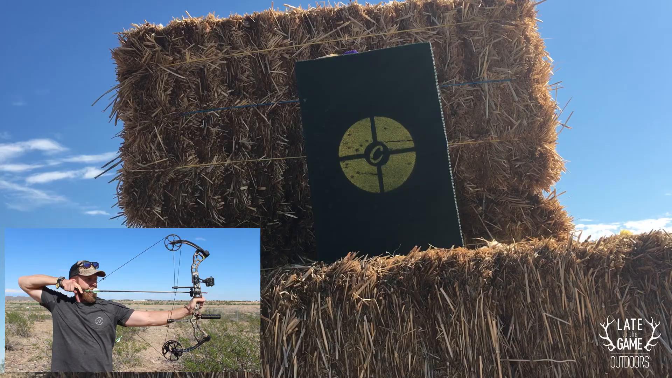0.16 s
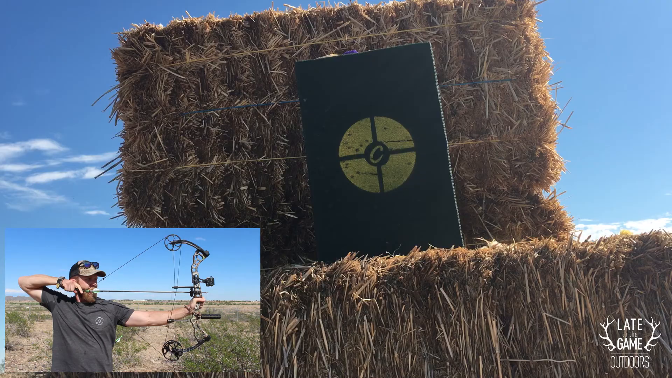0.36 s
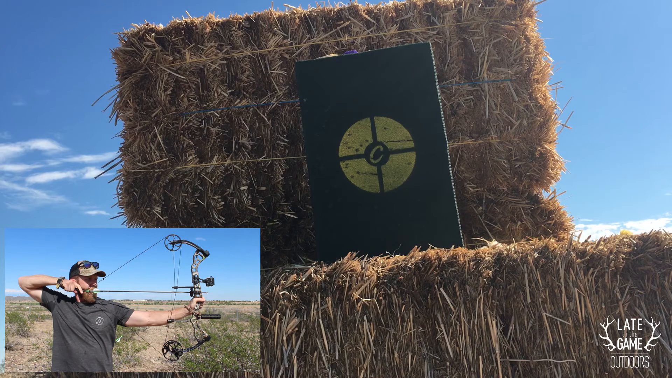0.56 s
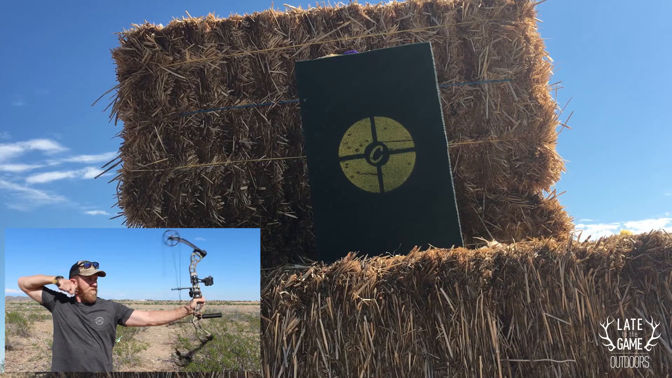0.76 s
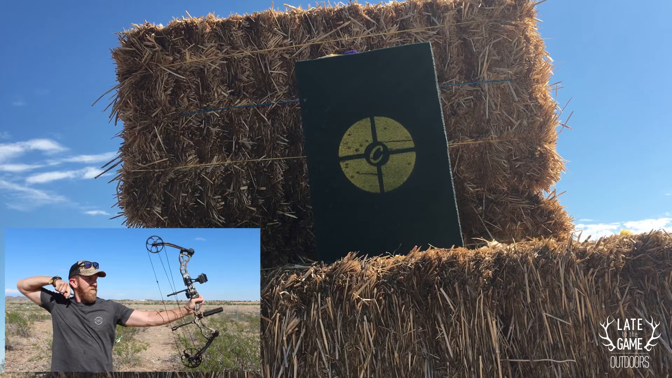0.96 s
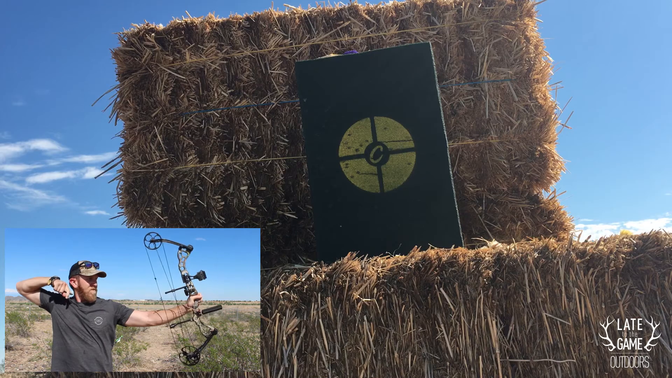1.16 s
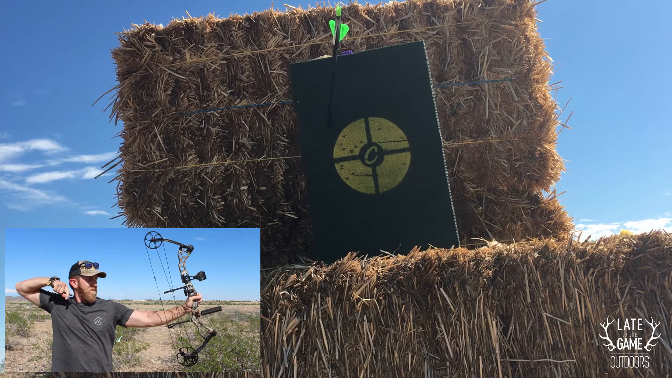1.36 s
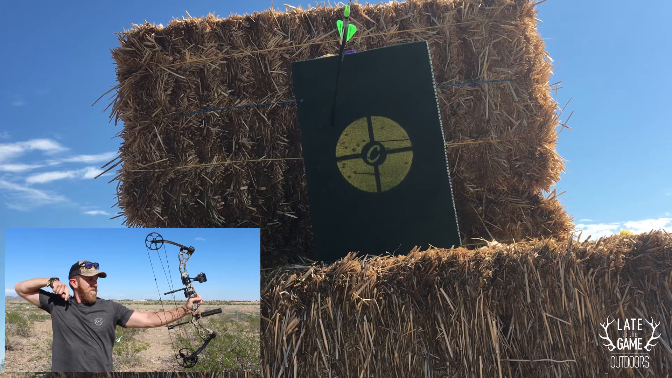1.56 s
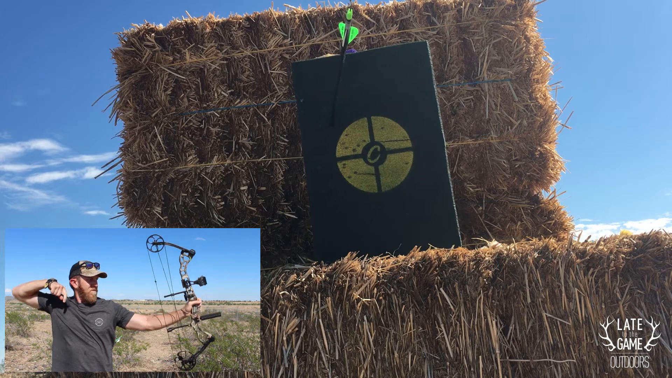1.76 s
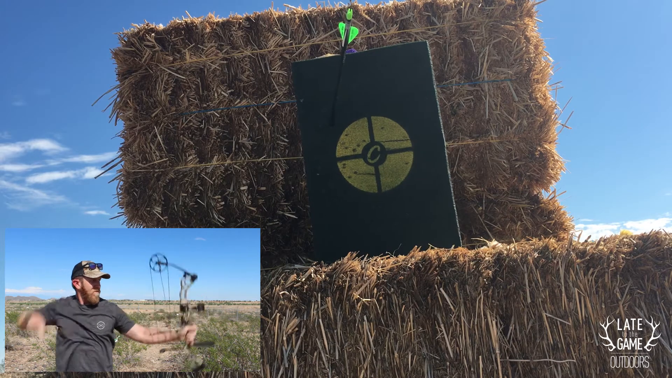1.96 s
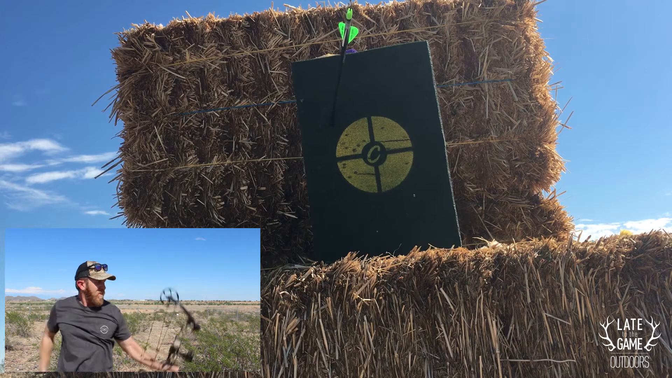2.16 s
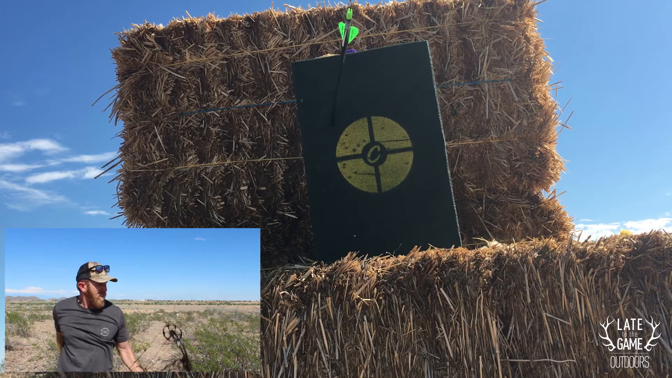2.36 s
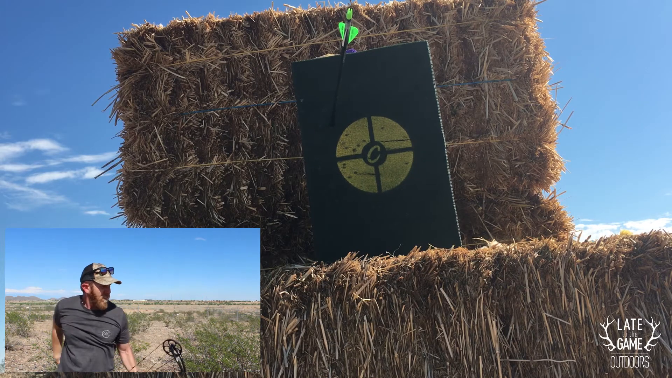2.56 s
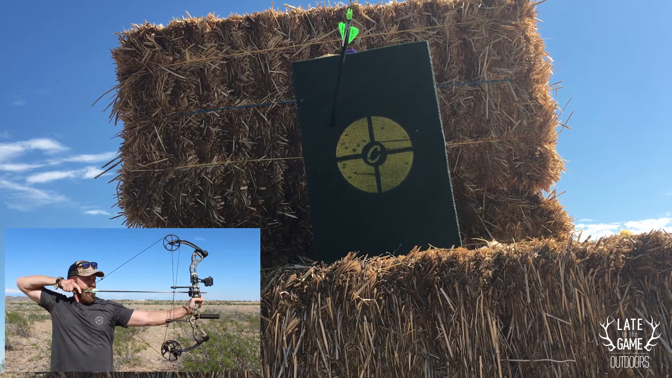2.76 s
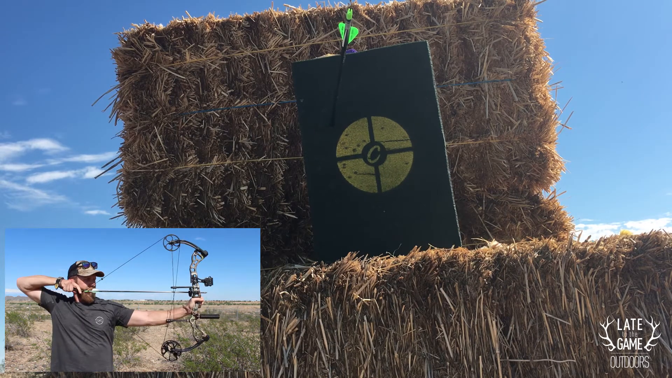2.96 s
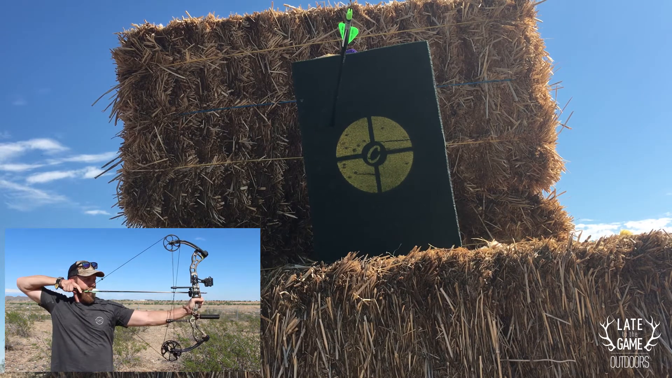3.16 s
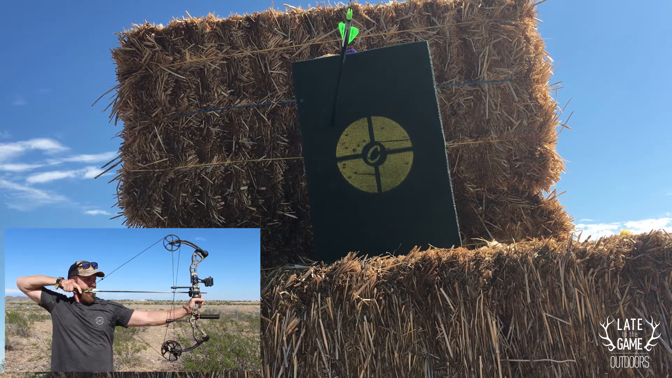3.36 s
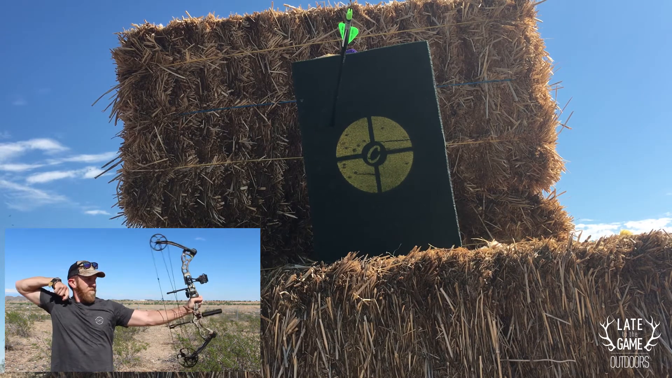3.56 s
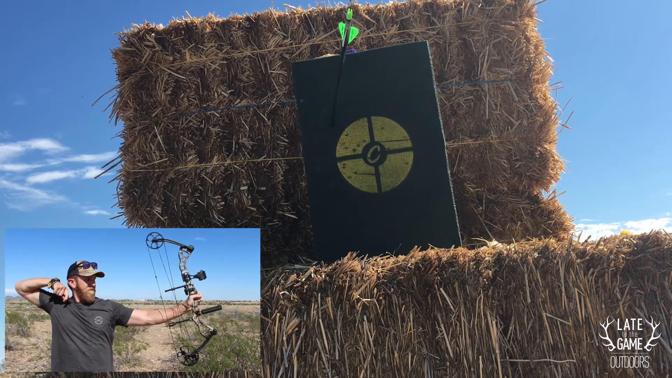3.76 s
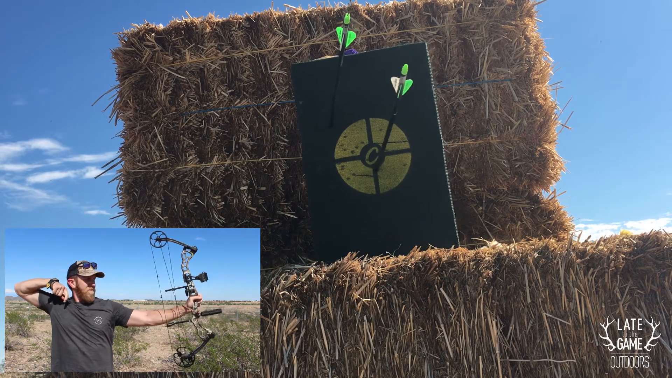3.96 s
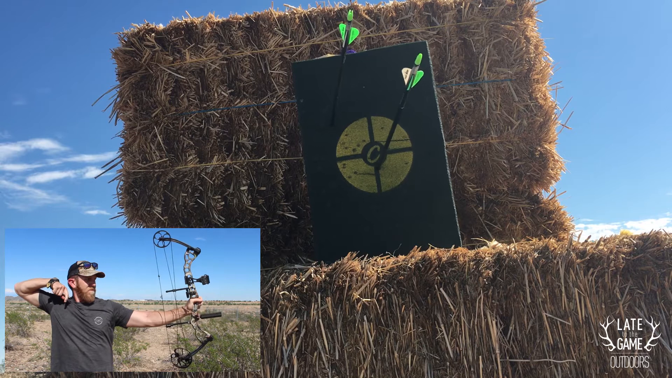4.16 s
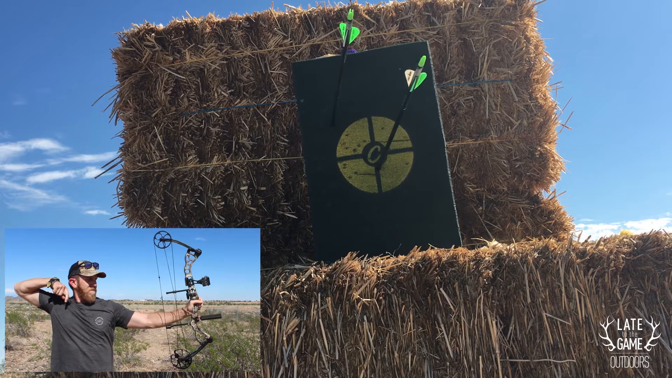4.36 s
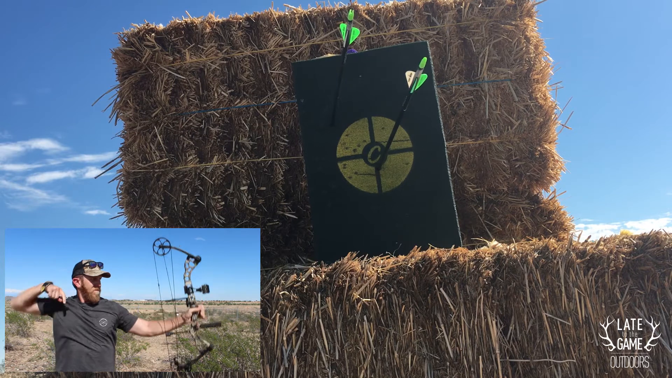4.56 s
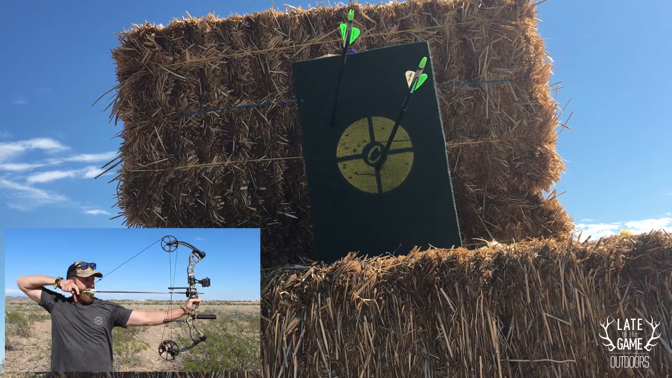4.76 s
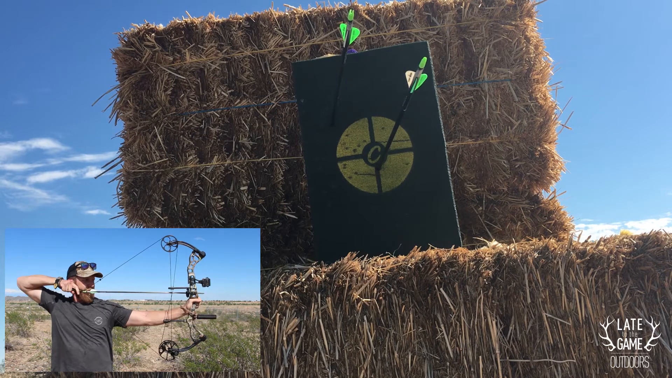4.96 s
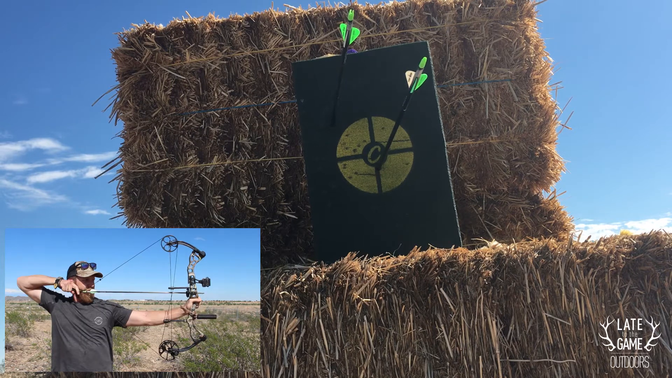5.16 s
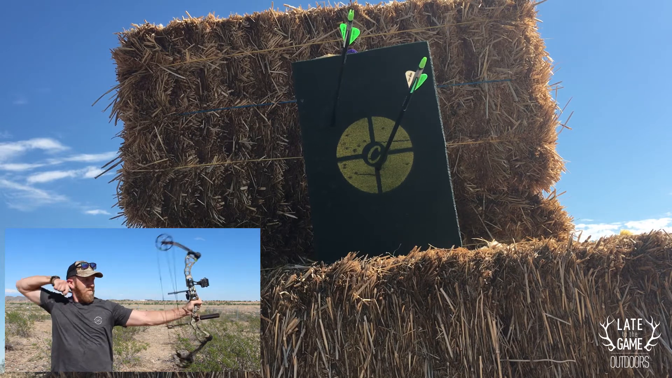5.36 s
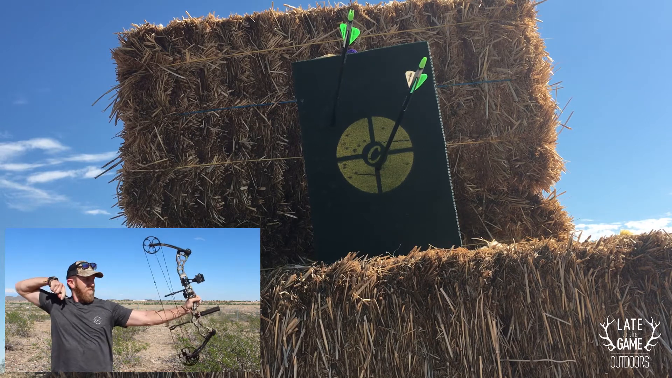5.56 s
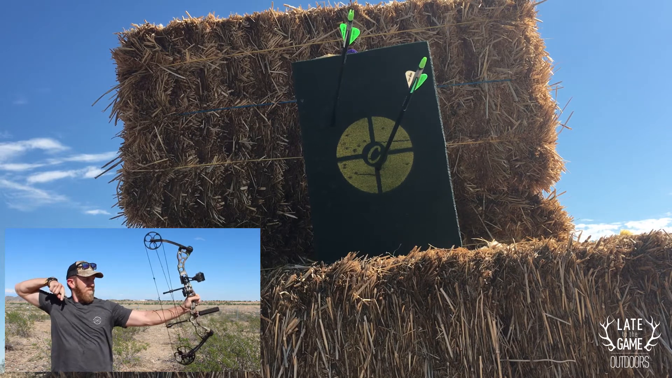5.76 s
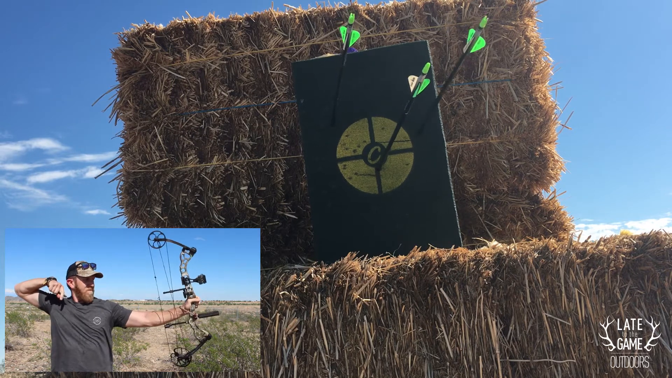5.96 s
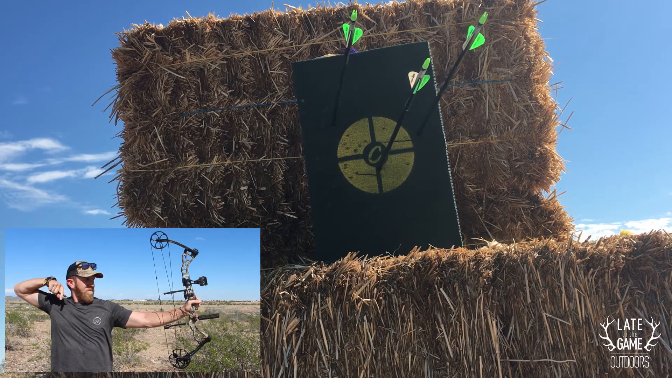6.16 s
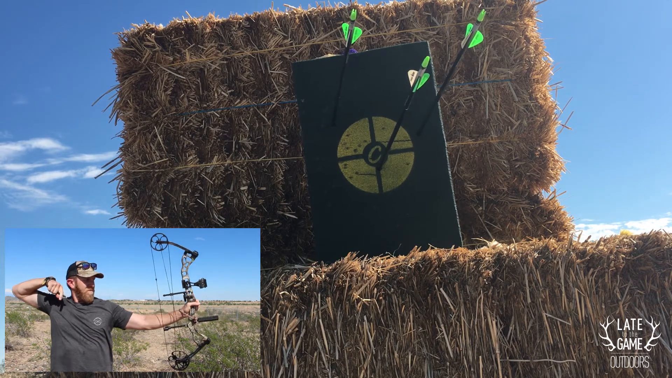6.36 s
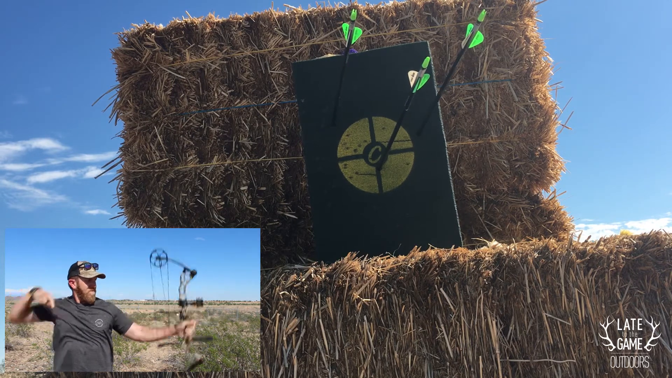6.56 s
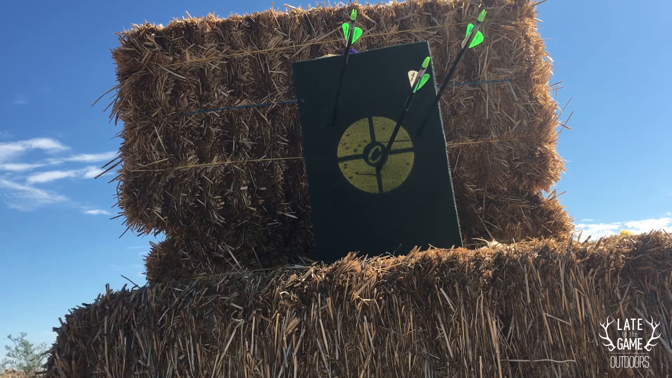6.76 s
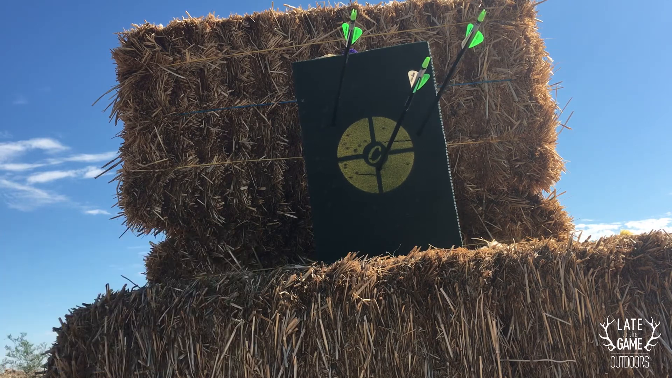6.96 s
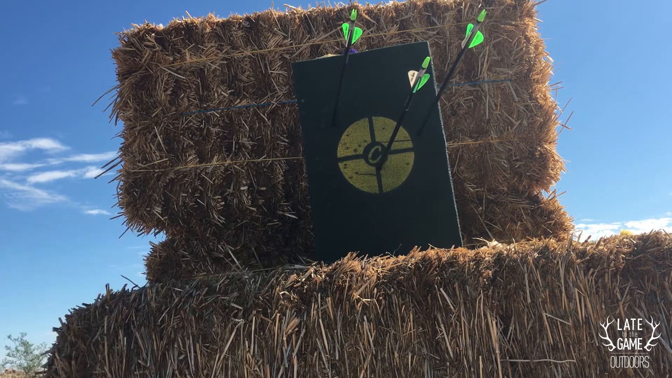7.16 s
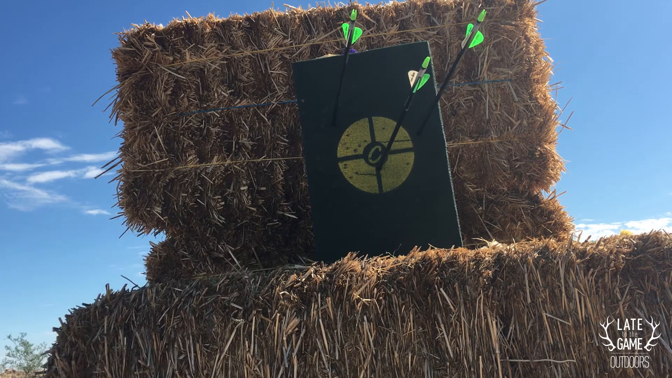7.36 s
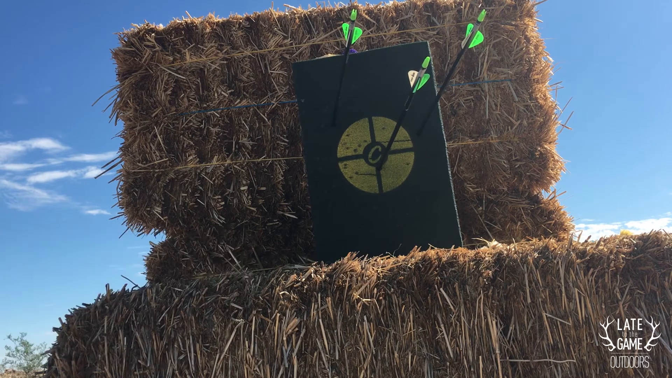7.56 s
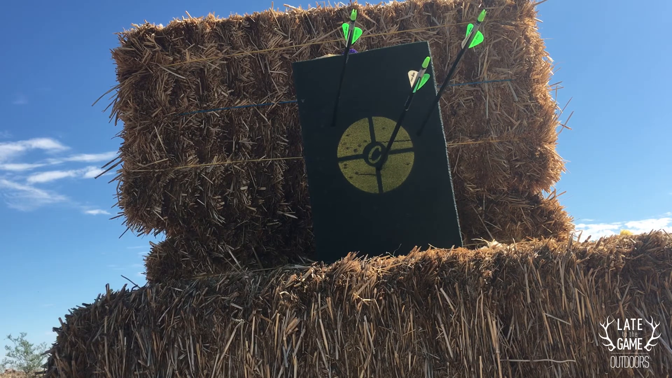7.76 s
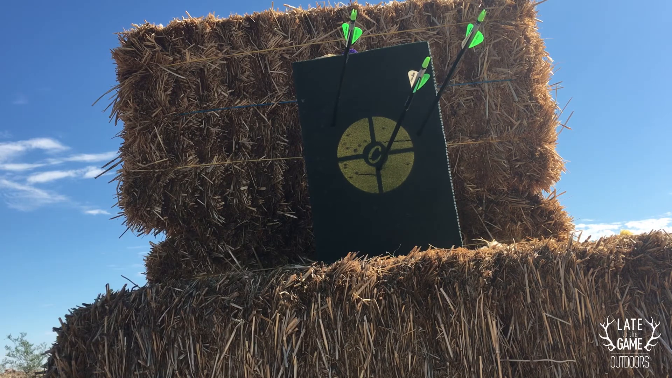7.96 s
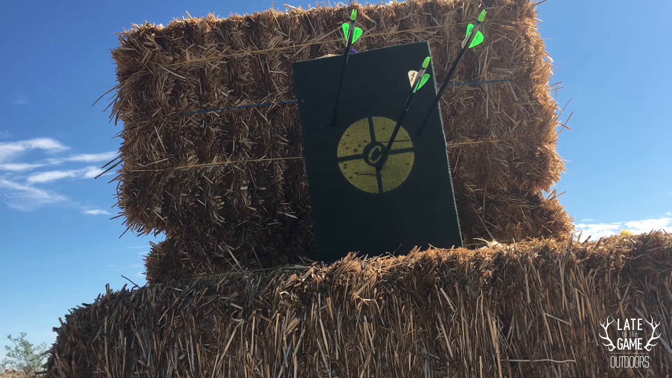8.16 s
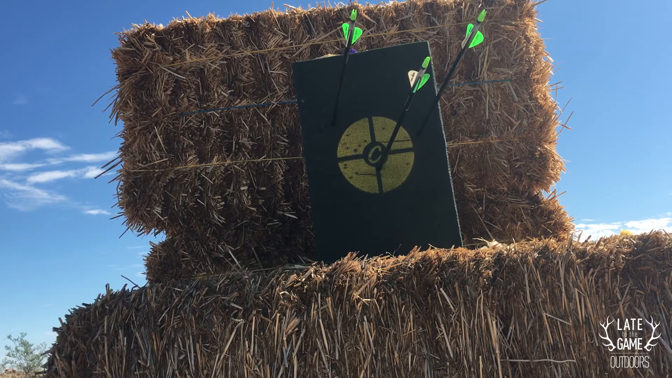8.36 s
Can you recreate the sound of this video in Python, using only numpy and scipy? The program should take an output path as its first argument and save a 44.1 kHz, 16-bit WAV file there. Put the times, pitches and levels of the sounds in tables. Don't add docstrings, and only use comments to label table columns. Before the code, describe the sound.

Outdoors in light wind, a compound bow fires three times. Each release ticks, whips upward and slaps loudly, limbs ringing and rattling briefly. Over half a second later an arrow hisses in and cracks into foam with a boxy thump, followed by a duller distant knock. Close microphones at both bow and target; hiss cuts in before each shot and thins out. A grasshopper rasps near the end.

```python
import sys
import numpy as np
from scipy import signal
from scipy.fft import rfft, irfft, next_fast_len
from scipy.io import wavfile
from scipy.ndimage import uniform_filter1d

SR = 44100
rng = np.random.default_rng(int(sys.argv[2]) if len(sys.argv) > 2 else 0)


def elevation(decibels):
    levels = np.asarray(decibels, float)
    return 10 ** (levels / 20)


def waveform_to_disk(signal):
    frames = np.transpose(np.atleast_2d(signal))
    scaled = np.clip(frames, -1, 1) * 32767
    samples = np.round(scaled).astype(np.int16)
    wavfile.write(sys.argv[1], SR, samples)


N = 374497
T = np.arange(N) / SR


def colour(x, spectrum):
    hz, db = np.transpose(spectrum)
    f = np.fft.rfftfreq(x.shape[-1], 1 / SR)
    gain = elevation(np.interp(np.log(f + 1), np.log(hz), db))
    y = irfft(rfft(x) * gain, x.shape[-1])
    return y / np.sqrt(np.mean(y ** 2))


def noise(spectrum, size=8192):
    return colour(rng.standard_normal(size), spectrum)


def wide(spectrum, size):
    mid, side = rfft(noise(spectrum, size=(2, size)))
    f = np.fft.rfftfreq(size, 1 / SR)
    side = side * elevation(np.interp(np.log(f + 1), np.log([100, 380, 4000]), [-30, -6, -1]))
    return irfft(np.array([mid + side, mid - side]), size)


def hump(hz, width, fall_db=-30):
    low = max(hz - width / 2, hz / 4)
    return [(low / 2, fall_db), (low, -3), (hz, 0), (hz + width / 2, -3), (hz + 2 * width, fall_db)]


def fade(t, t60, rise=0.00013):
    return np.clip(t / rise, 0, 1) * elevation(-60 * np.maximum(t, 0) / t60)


def ring(t, modes, spread=0.027, rise=0.00044, scatter_db=-1.0):
    out = 0
    for hz, db, t60 in modes:
        detune, reweight, phase = rng.standard_normal(3)
        tone = np.sin(2 * np.pi * hz * (1 + spread * detune) * t + phase)
        out = out + elevation(db + scatter_db * reweight) * fade(t, t60, rise) * tone
    return out


def struck(t, modes, rise=0.00031, align=0.):
    return sum(elevation(db) * fade(t, t60, rise) * np.sin(2 * np.pi * hz * (t - align)) for hz, db, t60 in modes)


def add(out, s, x, lead=0.):
    i = int((s - lead) * SR)
    out[..., i:i + x.shape[-1]] += x[..., :N - i]


def walk(rate):
    k = int(SR / rate)
    steps = np.repeat(rng.standard_normal(N // k + 1), k)
    return 1.2 * uniform_filter1d(steps, k)[:N]


def ramp(start, length):
    return np.clip((T - start) / length, 0, 1)


def ducking():
    out = 0
    for (_, _, start, _, _), (_, _, _, duck_db, returns) in zip(CUT_IN, SUPPRESSION):
        out = out + duck_db * (ramp(start, .12) - ramp(returns, 0.22))
    return out


# burst_db, settled_db, cut_s
LIFTS = [
    (-56, -62, 1.872),
    (-59.5, -61.5, 4.536),
    (-58, -61.5, 6.44),
]


def lift():
    out = 0
    for (s, *_), (burst_db, settled_db, cut) in zip(HITS, LIFTS):
        times = [0, 0.049, 0.14, .19, cut - s]
        levels = [-90, burst_db, settled_db - 3, settled_db, settled_db - 3.5]
        out = out + elevation(np.interp(T - s, times, levels)) * (T > s) * (T < cut)
    return out


# freq_hz, level_db
RUMBLE_SPECTRUM = [(15, -39), (25, -13), (60, -4), (112, -0.5), (180, -11), (260, -18), (400, -26),
                   (1000, -35), (2500, -45), (3300, -70)]
# freq_hz, level_db
AIR_SPECTRUM = [(1500, -13.5), (2500, -2.5), (4200, -3.5), (5000, -5.5), (6200, -1.5), (7500, -6.5),
                (9000, -1), (10500, -5.5), (12000, -0.5), (14800, 2), (16000, -0.5)]
# freq_hz, level_db
LIFTED_SPECTRUM = [(180, -35.5), (300, -4.5), (418, -1.5), (502, -13), (828, -14), (7820, -20),
                   (12500, -19), (16000, -21.5)]


def open_range():
    rumble_db = -58.5
    rumble = elevation(rumble_db + 1.5 * walk(1.6)) * noise(RUMBLE_SPECTRUM, size=N)
    air = elevation(-73.5 + .9 * ducking()) * noise(AIR_SPECTRUM, size=N)
    side = elevation(rumble_db - 22.5) * noise(RUMBLE_SPECTRUM[:6] + [(500, -60)], size=N)
    lifted = lift() * noise(LIFTED_SPECTRUM, size=N)
    return rumble + air + side * np.array([[1], [-1]]) + lifted


def slots(bands, wash_db, tilt_db, extra_hz=120):
    f = np.linspace(250, 16000, 800)
    tops = [db - 6 * np.abs((f - hz) / (.5 * width + extra_hz)) ** 2.5 for hz, width, db in bands]
    wash = wash_db + tilt_db * np.log2(f / 1000)
    return np.transpose([f, np.max(tops + [wash], axis=0)])


# freq_hz, width_hz, level_db
BANDS = [
    [(980, 300, 0.5), (1300, 90, -2), (1770, 100, -8), (2498, 110, -4.5), (2950, 110, -1), (3860, 250, -11),
     (4770, 110, -13), (5430, 120, -12), (6120, 110, -13.5)],
    [(1240, 100, -1), (1900, 140, -1.5), (2250, 90, -6), (2950, 210, 1), (4044, 150, -8), (4870, 150, -5),
     (6200, 150, -7.5), (6863, 160, -10.5), (9125, 80, -8.5)],
    [(937, 280, 3.5), (1940, 420, -1), (2840, 530, 1.5), (3875, 500, -2), (5200, 450, -3),
     (5750, 150, -9.5), (6815, 350, -7), (7450, 200, -10), (8370, 150, -16.5), (9600, 150, -9),
     (10200, 150, -13), (11100, 100, -13.5)],
]
BAND_CHANGE_S = [2.64, 4.76]
# level_db at 1 kHz, tilt_db per octave
WASH = [
    (-10, -6),
    (-6, -3),
    (-7, -4.5),
]
# bands_db, fade_start_s, rest_db, hiss_duck_db, hiss_return_s
SUPPRESSION = [
    (-65, 1.7, -78.5, -11.5, 0.83),
    (-70, 3.87, -96.5, -17, 3.56),
    (-57, 5.95, -81.5, -8, 6.17),
]
ARCHER_OUT_S = 6.6835


def residue():
    shot, size = np.searchsorted(BAND_CHANGE_S, T), next_fast_len(N)
    opened = CUT_IN[0][0]
    left = 0
    for k, (bands, (top_db, fades, rest_db, *_)) in enumerate(zip(BANDS, SUPPRESSION)):
        start = CUT_IN[k][2]
        present = ramp(start - .12 / 2, .12) - ramp(fades, 0.3)
        band_db = rest_db + (top_db - rest_db) * present
        band_db = np.where(T < opened, -63, band_db)
        total = sum(width * elevation(2 * db) for _, width, db in bands)
        for group in (bands[::2], bands[1::2]):
            share = np.sqrt(sum(width * elevation(2 * db) for _, width, db in group) / total)
            level = elevation(band_db + 1.9 * walk(30) + 1.2 * walk(6))
            left = left + (shot == k) * share * level * wide(slots(group, *WASH[k]), size)[:, :N]
    thin = elevation(-74.5 + ducking()) * (T > opened) * wide(HISS_SPECTRUM, size)[:, :N]
    return (thin + left) * (T < ARCHER_OUT_S)


# freq_hz, level_db
HISS_SPECTRUM = [(76, -30), (130, -2.5), (315, -12.5), (678, -14.5), (1030, -11), (1750, -19),
                 (2890, -15.5), (3680, -19), (4880, -18.5), (15100, -21.5), (16000, -31.5)]
# cut_in_s, hiss_db, suppression_start_s, fall_s, band_spread_s
CUT_IN = [
    (0.123, -54, .80, .06, .03),
    (2.642, -53, 3.3, 0.06, 0.0496),
    (4.761, -53.5, 5.42, .08, .05),
]


def archer_hiss():
    out, t = np.zeros((2, N)), np.arange(40960) / SR
    edges = np.linspace(60, 16000, 41)
    f = np.fft.rfftfreq(len(t), 1 / SR)
    band = np.digitize(f, edges)
    for s, db, start, fall, spread in CUT_IN:
        full = rfft(wide(HISS_SPECTRUM, len(t)))
        late = spread * (0.84 * rng.standard_normal(len(edges)) + 2.8 - 3.5 * edges / edges[-1])
        hiss = 0
        for k in range(1, len(edges)):
            gate = elevation(-40 * np.clip((t + s - start - late[k]) / fall, 0, 2))
            hiss = hiss + irfft(full * (band == k)) * gate
        add(out, s, elevation(db) * hiss)
    return out


# time_s, level_db
BREEZE = [(0, -41), (1.3, -46), (1.7, -49.5), (2.5, -55), (3.15, -45), (3.6, -61.5), (3.9, -48), (4.4, -52),
          (4.85, -44.5), (5.8, -47), (6.35, -54), (6.68, -49)]
# peak_s, peak_db
GUSTS = [(.1, -44), (.16, -36), (.575, -31.5), (0.623, -28), (.69, -37), (0.779, -28), (1.26, -39.5),
         (1.482, -34), (1.777, -36), (2.21, -39.5), (2.44, -51), (2.77, -41), (3.93, -38.5), (4.14, -36),
         (4.19, -41.5), (4.28, -43), (4.86, -40), (4.95, -40.5), (5.04, -43), (5.15, -41), (5.3, -36.5),
         (5.6, -36.5), (6.058, -32), (6.27, -48), (6.55, -42)]
# freq_hz, level_db
GUST_SPECTRUM = [(12, -28), (20, 6.5), (33, -3), (51, -2.5), (91, -10), (123, -16.5), (275, -34.5),
                 (400, -37), (520, -61.5), (880, -120)]
# start_s, level_db, pitch_hz, t60_s
BUFFETS = [
    (0.121, -20.5, 39, 0.037),
    (.575, -33, 36.3, 0.83),
    (1.773, -28, 44.6, 0.3),
]
# time_s, level_db
TARGET_WIND = [
    (6.68, -68),
    (7.05, -60),
    (7.3, -77),
    (8.3, -73),
    (8.5, -52),
]


def wind():
    db = np.interp(T, *np.transpose(BREEZE))
    for s, peak_db in GUSTS:
        db = np.maximum(db, peak_db - np.maximum(260 * (s - T), 329 * (T - s)))
    level = elevation(db + 2.6 * walk(22)) * np.clip((ARCHER_OUT_S - T) * 400, 0, 1)
    mid, side = level * noise(GUST_SPECTRUM, size=(2, N))
    t = np.arange(16384) / SR
    for s, db, hz, t60 in BUFFETS:
        add(mid, s, -elevation(db) * fade(t, t60, 0.0037) * np.sin(2 * np.pi * hz * t + 0.84))
    low = noise([(14, -19.0), (25, 1), (50, -3.0), (110, -30.5), (300, -90.5)], size=N)
    mid = mid + elevation(np.interp(T, *np.transpose(TARGET_WIND), left=-120)) * low
    return mid + elevation(-28.0) * side * np.array([[1], [-1]])


# start_s, level_db
STROKES = [(1.983, -65), (4.549, -60.5), (4.609, -59.5), (4.664, -59), (6.473, -63.5), (6.536, -57.5),
           (6.618, -59), (6.665, -57.5), (6.725, -58), (6.873, -65.5), (6.924, -61), (7.049, -57),
           (8.075, -72), (4.32, -63), (4.435, -65), (4.495, -62.5), (8.236, -63.5), (8.466, -63)]


def grasshopper(tooth_hz=240):
    out, t = np.zeros(N), np.arange(8192) / SR
    hz = 10400
    spectrum = [(hz * 0.47, -34), (hz * 0.58, -8), (hz, 0), (16000, -4)]
    for s, db in STROKES:
        length = .0165 + .0003 * (db + 60)
        pegs = 0.35 + np.sin(np.pi * tooth_hz * t) ** 2
        stroke = np.clip(np.minimum(t / 0.0031, (length - t) / 0.0018), 0, 1)
        add(out, s, elevation(db) * pegs * stroke * noise(spectrum))
    return out


# start_s, level_db
SPLICE = (400, 6300, 0.0055)
SPLICES = [(0.122, -34.5), (4.761, -41), (6.683, -60)]
STRAW = (1800, 2400, 0.029)
STRAWS = [(1.668, -52), (4.229, -54), (6.092, -50.5), (6.241, -55.5), (6.266, -62), (6.384, -57)]
GEAR = (10000, 9300, 0.027)
GEARS = [(1.689, -55), (1.754, -68), (1.772, -58), (3.932, -59.5), (5.725, -68), (6.23, -54.5)]
THUD = (320, 500, 0.053)
THUDS = [(4.3, -51), (4.69, -60)]
RUSTLE = (900, 240, 0.31)
RUSTLES = [(1.94, -71), (2.02, -68.5)]
# start_s,
# pitch_hz, level_db
STALKS = [(1.6235, 2950, -52), (1.633, 1000, -47), (1.661, 4100, -56.5), (1.663, 2200, -55),
          (1.678, 2100, -53), (1.679, 3000, -55), (1.683, 2600, -57), (1.689, 2900, -53),
          (1.690, 1300, -56), (1.466, 2000, -23.5)]
# start_s, pitch_hz, level_db, t60_s
CHIRP = (4.672, 1830, -55, .06)


def ticks():
    out, t = np.zeros(N), np.arange(8192) / SR
    kinds = ((SPLICE, SPLICES), (STRAW, STRAWS), (GEAR, GEARS), (THUD, THUDS), (RUSTLE, RUSTLES))
    for (hz, width, t60), rows in kinds:
        for s, db in rows:
            add(out, s, elevation(db) * fade(t, t60) * noise(hump(hz, width)))
    for s, hz, db in STALKS:
        add(out, s, struck(t, [(hz, db, 0.011)]))
    add(out, CHIRP[0], ring(t, [CHIRP[1:]], spread=0, rise=.005, scatter_db=0))
    return out


# start_s, crack_db, second_knock_db, thump_db, scatter_db
LATE = [
    (1.6015, -38, -0.5, -35.5, -47),
    (4.2619, -41.5, -12.5, -34.5, -46.5),
    (6.1649, -36, -6, -28.5, -49),
]
# freq_hz, level_db
FAR_SPECTRUM = [(150, -36), (250, 5.5), (921, 1.5), (1140, 1), (1730, -7.5), (2330, -6), (4380, -12.5),
                (5250, -26), (5740, -17), (6370, -59), (9000, -48), (11700, -74), (19800, -120)]
# pitch_hz, level_db, t60_s
KNOCKS = [
    [(980, -25, 0.018), (1330, -40, 0.026), (636, -48, 0.022), (3060, -45, 0.024), (3900, -48, 0.02)],
    [(1043, -32, 0.038), (597, -38.5, 0.054), (2200, -26.5, 0.012), (3700, -39, .012), (5200, -29, 0.0092)],
    [(1104, -32, 0.024), (624, -63, 0.078), (1990, -47, 0.0099), (2700, -40.5, 0.024), (5340, -38.5, 0.012)],
]


def late_hit():
    out, t = np.zeros(N), np.arange(8192) / SR
    for (s, crack_db, second_db, thump_db, scatter_db), modes, block in zip(LATE, KNOCKS, BLOCK):
        knock = ring(t, modes, spread=0.005, rise=0.00079, scatter_db=3.5)
        knock = knock + elevation(second_db) * ring(t - .004, modes, spread=0.083, scatter_db=1.0)
        ground = colour(noise(FAR_SPECTRUM), [(1000, 5), (6000, -9)])
        scatter = elevation(scatter_db) * fade(t - .006, 0.19, 0.0012) * ground
        crack = elevation(crack_db) * fade(t, 0.057) * noise(FAR_SPECTRUM)
        thump = ring(t - .011, block[2:], spread=0.054, rise=0.0015, scatter_db=-2.0)
        add(out, s, knock + scatter + crack + elevation(thump_db) * thump)
    return out


# start_s, punch_db, slide_s, slide_db
HITS = [
    (1.4595, -10, .0108, -26),
    (4.1200, -10, .0105, -26),
    (6.0239, -9.5, .0103, -23.5),
]
# second_bite_s, second_bite_db, thump_db, whoosh_db
BITES = [
    (0.004, -7.5, -18, -37),
    (.0025, -15, -14, -37),
    (0.0037, -16.5, -11.5, -36.5),
]
# freq_hz, level_db
WHOOSH_SPECTRUM = [(180, -39), (300, -9.5), (1280, -8), (1560, -6.5), (2840, -2.5), (4910, -6.5),
                   (6300, -7.5), (13100, -14), (16000, -14.5)]
PUNCH_SPECTRUM = [(240, -29.5), (400, 1), (1040, -14), (2150, 6), (3260, -11), (5600, -2.5), (10500, -14),
                  (16000, -20)]
SLIDE_SPECTRUM = [(180, -22.5), (300, 8), (1200, -14), (2300, -3), (3350, -13), (5700, -7), (7440, -10.5),
                  (16000, -9.5)]
# pitch_hz, level_db, t60_s
POINT = [
    [(2170, -4, 0.0081), (4110, -5.5, .005), (5900, -3, 0.0057), (7250, -10.5, 0.0036), (12000, 2, .0036),
     (1056, -9, 0.012), (3000, -12.5, 0.0055)],
    [(2200, -1.5, 0.0083), (3740, -9.5, 0.0091), (6690, -2, 0.0057), (5300, -11, .005),
     (12240, -5.5, .0036), (602, -9, 0.017), (8500, -5.5, 0.0046)],
    [(2370, -5.5, .006), (3860, -9.5, 0.011), (5630, 0, 0.0096), (1740, -7.5, 0.02), (11900, -4, .0036),
     (7700, -3.5, 0.0039), (397, -5, 0.012)],
]
# pitch_hz, level_db, t60_s
BLOCK = [
    [(75, -1.5, 0.067), (134, -1.5, 0.061), (224, 1.4, 0.036), (333, 5, 0.022), (544, 0, 0.028)],
    [(82.4, -2, 0.088), (131.4, -0.5, 0.06), (205, -1, 0.03), (401.7, 2, 0.039), (520, -10.5, 0.045)],
    [(91.4, -2.5, 0.066), (149, -1.5, 0.049), (262, -2, 0.028), (412, 0.7, 0.035), (537, -16.5, 0.059)],
]


def arrow():
    out, lead = np.zeros(N), .15
    t = np.arange(16384) / SR - lead
    for (s, punch_db, slide, slide_db), bites, point, block in zip(HITS, BITES, POINT, BLOCK):
        bite, bite_db, thump_db, whoosh_db = bites
        near = (0.011 / (.012 - np.minimum(t + 0.014, 0))) ** 2.01
        near = near * np.clip((t + lead - .06) / 0.054, 0, 1) * elevation(-700 * np.maximum(t, 0))
        whoosh = elevation(whoosh_db) * near * noise(WHOOSH_SPECTRUM, size=len(t))
        punch = elevation(punch_db) * fade(t, 0.0095, .0001) + elevation(bite_db) * fade(t - bite, 0.02, 0.0004)
        punch = elevation(-3.0) * punch * noise(PUNCH_SPECTRUM, size=len(t))
        shaft = elevation(punch_db) * ring(t, point, spread=0.01, rise=.0001, scatter_db=-0.2)
        again = ring(t - bite, point[:3], spread=0.02, rise=0.00032, scatter_db=5.0)
        shaft = shaft + elevation(bite_db) * again
        rub = (t > 0) * np.clip((slide - t) / 0.0014, 0, 1) + elevation(-34) * fade(t - slide, 0.045)
        rub = elevation(slide_db) * rub * noise(SLIDE_SPECTRUM, size=len(t))
        thump = ring(t - slide + .001, block, spread=0.01, rise=0.0027, scatter_db=-0.3)
        thump = thump + elevation(-18) * ring(t, block[2:], rise=0.0023)
        straw = noise(hump(1498, 2000, fall_db=-25.0), size=len(t))
        settle = elevation(-28.5) * fade(t - slide, 0.09) * straw
        add(out, s, whoosh + punch + shaft + rub + elevation(thump_db) * (thump + settle), lead)
    return out


# lead_s, second_click_db
JAW = [
    (.0261, -16),
    (.0263, -10.5),
    (.0253, -7),
]
# pitch_hz, level_db, t60_s
JAW_MODES = [
    [(3030, -22, .01), (1720, -26.5, .01), (4630, -28, .008)],
    [(1920, -19.5, 0.025), (3100, -29, .01), (5300, -31, .012)],
    [(3100, -20, .012), (900, -25.5, .012), (5800, -27, .008)],
]
# freq_hz, level_db
TRIGGER_SPECTRUM = [(290, -35.5), (500, -5.5), (1360, -4.5), (3020, -1), (4210, -11.5), (5710, -9),
                    (14200, -24), (16000, -30)]
NOCK_LEAD_S = [0.016, 0.012, .0127]


def release(t, shot):
    lead, again_db = JAW[shot]
    modes, nock_db = JAW_MODES[shot], RISER[shot][2]
    click = struck(t + lead, modes) + elevation(again_db) * struck(t + lead - .006, modes, rise=.001)
    tick = fade(t + lead, 0.019) + elevation(-16) * fade(t + lead + .003, 0.017)
    tick = tick + elevation(-12.5) * fade(t + lead - .006, 0.046, 0.0064)
    tick = tick + elevation(nock_db) * fade(t + NOCK_LEAD_S[shot], 0.021)
    return click + elevation(-22) * tick * noise(TRIGGER_SPECTRUM, size=len(t))


def string_whip(t, lead, whip_s, end_hz, whip_db):
    run = np.clip(1 + t / whip_s, -1, 1.2)
    pitch = np.maximum(1500 + (end_hz - 1500) * run, 500)
    sweep = np.sin(2 * np.pi * np.cumsum(pitch) / SR)
    swell = elevation(30 * np.minimum(run - .6, 0) - 130 * np.maximum(-run, 0)) * (run > -1)
    swell = swell * fade(t + lead, 1e9) * elevation(-3000 * np.maximum(t, 0))
    rough = elevation(3.3 * noise(hump(680, 700), size=len(t)))
    return elevation(whip_db) * swell * sweep * rough


# pitch_hz, level_db, t60_s
CABLES = [(3056, 0.5, .014), (2840, -5.5, .014)]
# delay_s, level_db
PLUCKS = [
    [(-.0045, -7), (-.0025, -3), (.002, -12), (.008, -16.5), (.013, -20), (.021, -21), (.037, -24.5)],
    [(-.0055, 0.5), (-.003, 1.5), (.0035, -2.5), (.0095, -13), (.017, -18), (.022, -21), (.035, -25)],
    [(-.005, -4.5), (-.0035, 5), (.004, -1.5), (.0095, -11.5), (.0145, -16.5), (.022, -19.5), (.034, -25)],
]


def cable_hum(t, shot):
    hum = 0
    for lag, db in PLUCKS[shot]:
        hum = hum + elevation(db) * ring(t - lag, CABLES, spread=.012, rise=0.0012, scatter_db=0.6)
    return hum


# delay_s, level_db
REBOUNDS = [
    [(-.0045, -16), (-.0022, -4), (0.0005, 8.5), (.005, -8.5), (.009, -14.5), (.016, -19), (0.0254, -20),
     (.0355, -25.5)],
    [(-.0045, -16.5), (-.0022, -6.5), (0, 6.5), (.004, -9.5), (.009, -12), (.016, -18), (0.031, -22),
     (.04, -23.5)],
    [(-.0045, -21.5), (-.0005, -4.5), (0.001, 2), (.0055, -7), (.0105, -10.5), (.017, -21.5), (0.027, -24),
     (.037, -23.5)],
]
# freq_hz, level_db
SLAP_SPECTRUM = [(120, -33), (200, -8.5), (836, -0.5), (2650, 0.5), (5130, -12.5), (6520, -7), (7410, -21),
                 (8270, -16), (13600, -31.5), (15000, -32.5), (15600, -50)]
# freq_hz, level_db
DULLER = [(3500, -1), (4600, -5), (14800, -6.5), (15500, -25)]
# pitch_hz, level_db, t60_s
CRACK = [
    [(910, -2, .014), (1910, -11.5, 0.0083), (2640, -7.5, .012), (3880, -12, 0.014), (6370, -17.5, .008)],
    [(786.4, 0.5, 0.015), (1740, -10.5, .010), (2480, -4, .014), (5192, -15, 0.01), (6364, -14, 0.00802)],
    [(720, -5.5, .014), (1680, -5, .012), (2500, -6, .012), (5520, -12, .008), (5960, -13, 0.0095)],
]


def string_slap(t, shot):
    crack = struck(t - .0002, CRACK[shot], rise=0.0016)
    slaps = sum(elevation(db) * fade(t - lag, 0.0096) for lag, db in REBOUNDS[shot][:3])
    bright = noise([(7000, -30), (11500, -3.5), (15000, -0.5), (15700, -26)], size=len(t))
    grit = elevation(-4.5) * noise(SLAP_SPECTRUM, size=len(t)) + elevation(-24.0) * bright
    later = sum(elevation(db) * fade(t - lag, 0.011) for lag, db in REBOUNDS[shot][3:])
    return crack + slaps * grit + later * colour(noise(SLAP_SPECTRUM, size=len(t)), DULLER)


# pitch_hz, level_db, t60_s
LIMBS = [(139.24, -26.5, 0.042), (221, -25.5, 0.2), (274.5, -13, .07), (693.4, -13, 0.07),
         (881, -14.5, 0.08), (1065, -12, 0.051), (1287, -23, 0.14), (1558, -16.5, 0.11), (1790, -11, .08),
         (1997, -15.5, 0.094), (2460, -17.5, 0.042), (2686, -10, 0.064), (2864, -13.5, 0.054),
         (3120, -14, 0.075), (3920, -16, 0.052), (4810, -18.5, 0.027)]
GRIP_HZ = [250, 480, 750, 1050, 1700, 3000]
GRIP_DB = [
    (-1.5, 1, 3.5, 2.2, -3, -1),
    (-0.5, -0.5, 4.1, 4.8, 0, 2),
    (-3.5, 1, 0.5, 1.5, -2, 1),
]
# pitch_hz, level_db, t60_s
LIMB_PAIR = [(430, -8.5, .065), (528, -5, .065)]
# lasting_ring_db, t60_s, nock_click_db
RISER = [
    (-20, 0.3, -30),
    (-21.5, 0.32, -19),
    (-19.5, 0.26, -3.5),
]


def limb_ring(t, shot):
    limbs = [(hz, db + np.interp(hz, GRIP_HZ, GRIP_DB[shot]), t60) for hz, db, t60 in LIMBS]
    shiver = elevation(2.3 * noise(hump(70, 90), size=len(t)))
    body = shiver * ring(t + .001, limbs, spread=0.0043, rise=0.0014, scatter_db=0.4)
    body = body + struck(t, LIMB_PAIR, rise=0.0034, align=.0027)
    riser_db, riser_t60, _ = RISER[shot]
    riser_hz = 497
    pair = [(riser_hz, riser_db, riser_t60), (riser_hz + 9, riser_db - 11, riser_t60)]
    gate = elevation(-350 * np.maximum(t - .135, 0))
    body = body + gate * ring(t, pair, spread=0.0036, rise=.065, scatter_db=0.5)
    return elevation(-2.5) * body


# freq_hz, level_db
RATTLE_SPECTRUM = [(120, -37.5), (200, -12), (509, 0), (1230, -5.5), (1420, -18.5), (1770, -10.5),
                   (3070, -12), (4200, -23.5), (8420, -29), (15000, -42), (15600, -60.5)]


def rattle(t):
    gate = elevation(-18 - 350 * np.maximum(t - 0.074, 0))
    return gate * fade(t, 0.2, 0.00053) * noise(RATTLE_SPECTRUM, size=len(t))


# start_s, level_db, whip_lead_s, whip_end_hz, whip_db
SHOTS = [
    (0.8087, -4, 0.0088, 5200, -11.5),
    (3.469, -5.5, 0.0072, 6410, -10.5),
    (5.3743, -3.5, 0.0065, 5957, -14.5),
]


def bow():
    out, lead = np.zeros(N), .05
    t = np.arange(24576) / SR - lead
    for shot, (s, db, whip_s, end_hz, whip_db) in enumerate(SHOTS):
        string = string_whip(t, lead, whip_s, end_hz, whip_db) + string_slap(t, shot)
        x = release(t, shot) + string + cable_hum(t, shot) + limb_ring(t, shot) + rattle(t)
        add(out, s, elevation(db) * x, lead)
    return out


def scene():
    background = open_range() + residue() + archer_hiss() + wind() + grasshopper() + ticks()
    return background + late_hit() + arrow() + bow()


def top_cut(x):
    return signal.sosfilt(signal.butter(12, 16520, fs=SR, output="sos"), x)


def record(dry):
    low_pass = signal.ellip(8, .2, 60, 15900, fs=SR, output="sos")
    mix = signal.sosfilt(low_pass, np.clip(dry, -.88, .88))
    return top_cut(mix)


dry = scene()
out = record(dry)
waveform_to_disk(out)
```